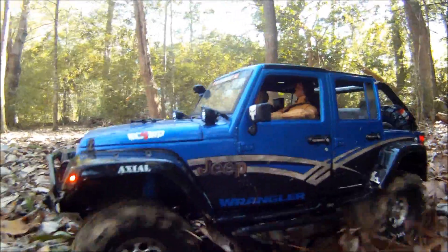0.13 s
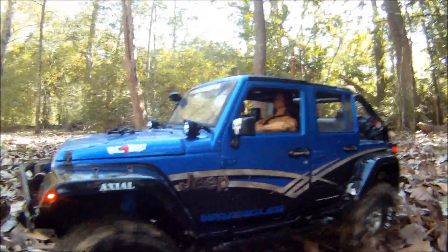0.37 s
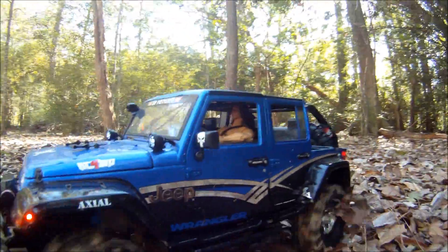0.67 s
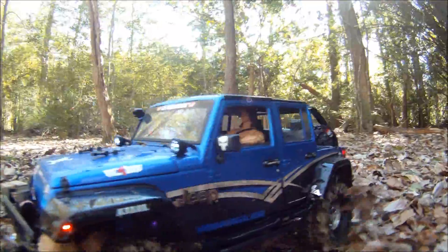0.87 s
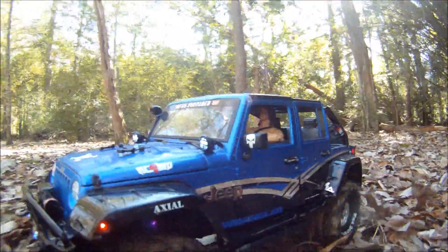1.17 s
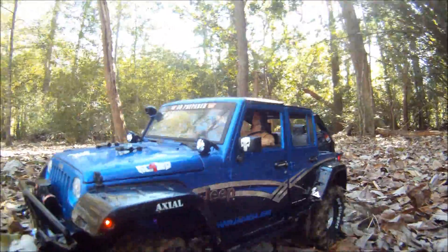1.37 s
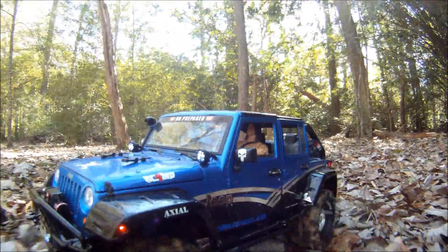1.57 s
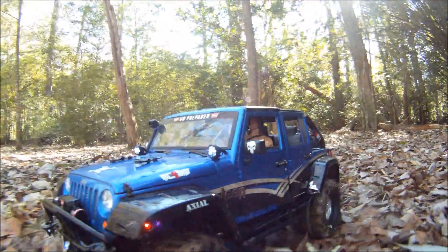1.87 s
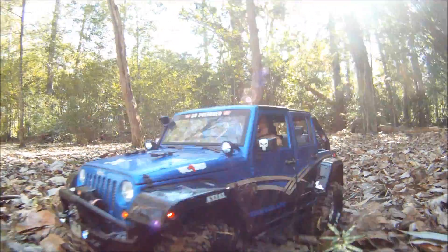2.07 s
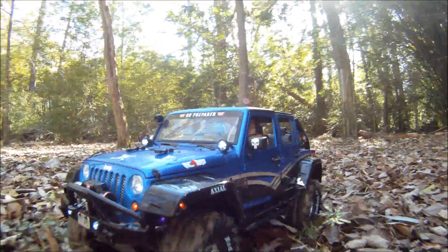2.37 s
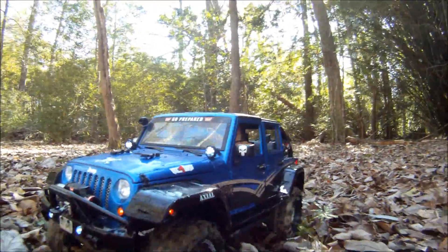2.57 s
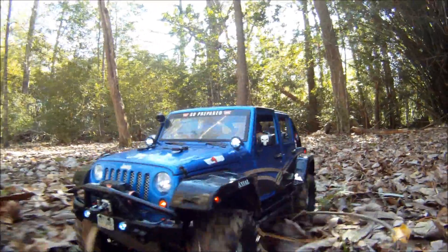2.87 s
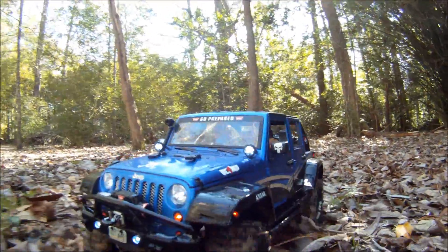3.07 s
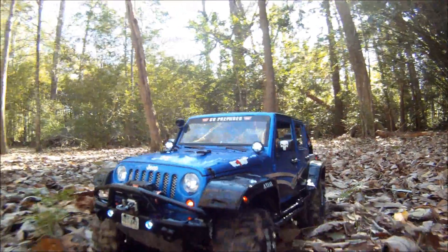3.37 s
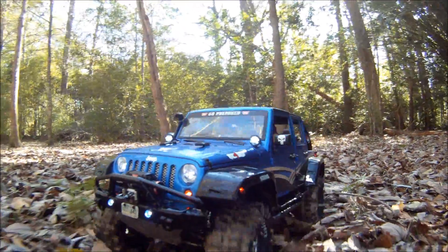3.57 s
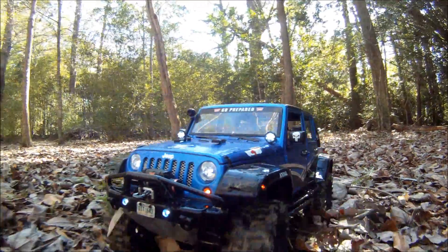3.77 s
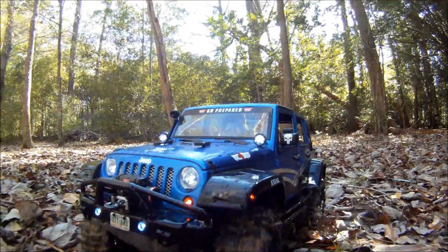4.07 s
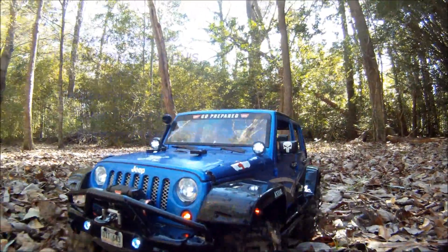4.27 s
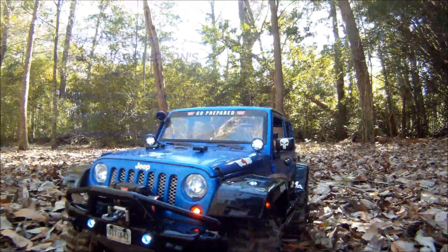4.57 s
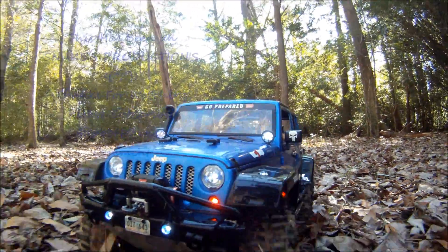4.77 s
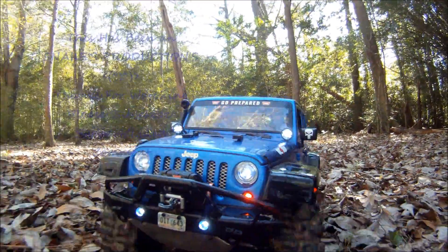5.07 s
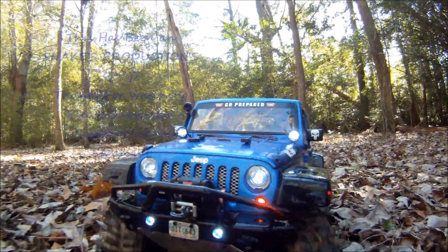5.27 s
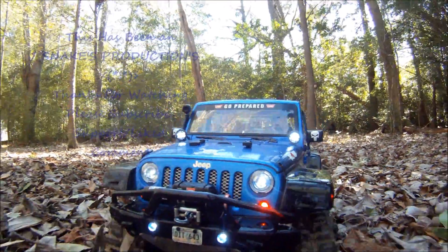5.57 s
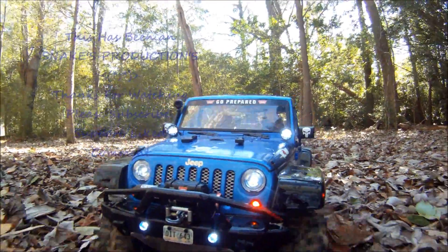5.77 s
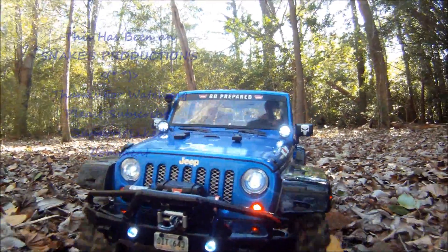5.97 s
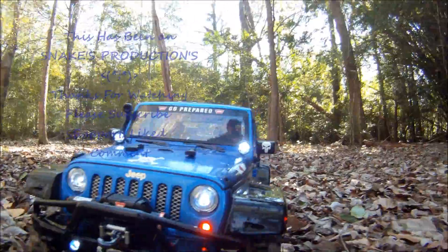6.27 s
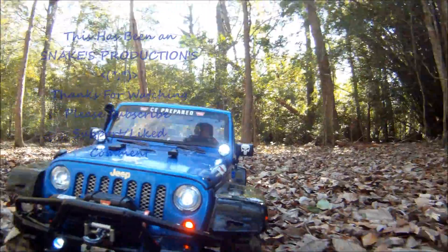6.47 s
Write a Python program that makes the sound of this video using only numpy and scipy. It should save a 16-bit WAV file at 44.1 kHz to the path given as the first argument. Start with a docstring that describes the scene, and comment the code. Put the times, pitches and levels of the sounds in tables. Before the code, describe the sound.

A small remote-control truck rolls steadily over dry leaves in a quiet wood. Leaves crunch continuously and snap in sharp, irregular ticks, while a faint gritty motor whirr throbs underneath. Low, short thuds come as wheels drop off sticks and jolt the microphone, carried on the truck itself. The treble is glassy and lo-fi, with steady hiss; snapping grows densest and loudest near the end.

```python
"""In a wood, a small electric model truck crawls over dry leaves, carrying a camera on an arm fixed to its chassis.
Leaves crunch and snap as trains of random fractures that excite the resonances of the plastic body and camera case.
The gears whirr as noise throbbing at the motor's rate; knocks from the ground ring the bending modes of the arm.
Steady noise gives the air of the wood and microphone hiss.
The camera samples slowly and holds each sample, which mirrors the crackle into a glassy treble."""
import sys
import numpy as np
from scipy import signal
from scipy.fft import rfft, irfft
from scipy.io import wavfile
from scipy.ndimage import uniform_filter1d

SR = 44100
rng = np.random.default_rng(int(sys.argv[2]) if len(sys.argv) > 2 else 0)


def store_pcm(level_fs):
    """Save levels as 16-bit WAV."""
    pcm = np.round(np.clip(level_fs, -1, 1) * 32767).astype(np.int16)
    wavfile.write(sys.argv[1], SR, np.atleast_2d(pcm).T)


N = 292824

# Levels in the tables are settings relative to one another; the functions trim them.
# resonances of the plastic body and camera case: centre_hz, width_hz, crunch_db, snap_db
CASE_MODES = [(650, 125, -18.5, -44), (960, 260, -16.5, -37), (1190, 360, -13.5, -27.5),
              (1590, 290, -7.5, -19.5), (1948, 360, 0.5, -26), (2198, 120, -2.5, -17), (2345, 167, 3, -29),
              (2528, 307, -2, -29), (2963, 450, -6.5, -29), (3360, 240, -5, -47), (3627, 300, -2.5, -2),
              (4070, 1520, -10, -30), (4780, 320, -4.5, -2.5), (4984, 350, -8, 3), (5276, 360, -5.5, -7),
              (5740, 680, -12.5, -11)]
# steady rolling of the tyres over the leaves: time_s, crunch_db, crackle_db
ROLLING_LEVELS = [(0.0, -52, -58), (0.2, -53, -61), (0.46, -60.5, -56), (0.72, -60, -75), (0.85, -59, -57),
                  (1.46, -51, -53), (1.83, -57, -57), (2.05, -57.5, -55), (2.25, -56, -59.5),
                  (2.88, -57.5, -57.5), (3.18, -56, -56.5), (3.85, -59, -60), (4.18, -59, -57.5),
                  (4.62, -53.5, -58.5), (4.83, -56.5, -57), (5.64, -51.5, -50.5), (6.05, -54.5, -51.5),
                  (6.23, -56.5, -52), (6.45, -51.5, -63), (6.64, -55.5, -43.5)]
# heaps of leaves pressed down by a tyre: peak_time_s, crunch_db, crackle_db, length_s
LEAF_HEAPS = [(0.23, -49.5, -58, 0.103), (0.364, -51, -59, 0.043), (0.717, -53, -63, 0.065),
              (0.808, -51, -54.5, 0.097), (0.916, -45.5, -56, 0.017), (1.2, -53.5, -68, 0.088),
              (1.268, -51.5, -57, 0.11), (1.659, -48, -65, 0.079), (2.072, -47.5, -70, 0.068),
              (2.163, -48.5, -72, 0.055), (2.614, -55, -56, 0.043), (2.727, -53.5, -65, 0.02),
              (3.048, -49.5, -73, 0.059), (3.566, -51.5, -56, 0.097), (4.003, -51, -75, 0.102),
              (4.105, -48.5, -62, 0.064), (4.465, -53, -58, 0.094), (4.66, -52.5, -72, 0.066),
              (5.048, -51, -54, 0.079), (5.522, -49.5, -52, 0.038), (6.062, -49, -52.5, 0.084),
              (6.139, -46, -56, 0.036), (6.56, -44.5, -53, 0.0705)]
# slow bending modes of the camera arm: centre_hz, width_hz, level_db
SWAY_MODES = [(65.58, 7.15, -0.5), (73.7, 30, -20)]
# fast bending modes of the camera arm: centre_hz, width_hz, level_db
SHUDDER_MODES = [(119, 30, -21), (135.1, 9.3, 0), (154.6, 26.5, 5.5), (217, 26, -9)]
# roughness of the ground, as steady shaking of the arm: time_s, sway_db, shudder_db
GROUND_ROUGHNESS = [(0.0, -53, -68), (0.83, -63.5, -67.5), (1.48, -54, -71), (1.9, -57.5, -72.5),
                    (2.5, -58, -66), (2.72, -53.5, -70.5), (4.18, -65, -72), (4.55, -54, -60.5),
                    (5.49, -55, -78), (5.84, -48.5, -53), (6.44, -52.5, -66), (6.64, -49.5, -60)]
# a wheel drops off a stick or a root and jolts the arm: start_s, sway_db, shudder_db
WHEEL_DROPS = [(0.13, -47.5, -72), (0.52, -49, -55.5), (0.65, -58, -57.5), (0.77, -46.5, -61),
               (0.85, -47, -57), (1.03, -52, -58), (1.207, -37.5, -55), (1.333, -40, -45.5),
               (1.45, -54, -49), (1.53, -45.5, -57), (2.09, -52, -55), (2.631, -38.5, -50),
               (2.81, -37.5, -45.5), (2.86, -43, -62), (3.04, -54, -55), (3.24, -56.5, -61),
               (3.88, -52.5, -59), (4.08, -55, -68), (4.44, -45.5, -50), (4.5, -52, -54), (4.61, -53, -58),
               (4.7, -58, -68), (4.84, -47, -67), (5.041, -47, -50), (5.13, -44.5, -61.5),
               (5.3, -45.5, -53.5), (5.38, -48.5, -48), (5.586, -38.5, -58), (5.66, -40.5, -58),
               (5.715, -35, -53), (5.87, -49, -55), (6.114, -36, -48.5), (6.2, -41, -57), (6.5, -46, -56)]
# spectrum of the slow rocking on the suspension: frequency_hz, density_db (per Hz)
ROCKING_SPECTRUM = [(8, -5.5), (17, 3), (26, -5), (48, 1), (70, -9.5), (110, -21), (250, -26), (600, -29),
                    (1200, -34), (3000, -84)]
# spectrum of the air of the wood and microphone hiss: frequency_hz, density_db (per Hz)
AIR_SPECTRUM = [(150, -4), (350, -2.5), (650, -6), (1100, 4.5), (2200, 10), (4000, 0.5), (5800, 0)]
# the loudest single leaves snapping: start_s, level_db, dull_part_db (relative to level_db)
LEAF_SNAPS = [(0.1374, -33.5, -4), (0.179, -29, -20), (0.8823, -33, -21), (0.9412, -29, -9),
              (1.4555, -38, -11), (1.5902, -31, -3), (1.7827, -34.5, -3.5), (1.8557, -32.5, -5),
              (1.906, -34.5, -20), (1.9733, -29.5, -20), (2.4422, -34.5, -6), (2.9663, -30.5, -8),
              (3.485, -33.5, -20), (4.096, -36, 4.5), (4.136, -30, -1), (4.3853, -30, -1.5),
              (4.6333, -34.5, -5), (4.8895, -27.5, -27), (4.9376, -30.5, -28), (5.0149, -31, -12),
              (5.2906, -34, -24), (5.5698, -31, -20), (5.7224, -40, -2), (5.7432, -27, -3),
              (5.8091, -32, -5), (6.1738, -32, -2.5), (6.211, -32, -5), (6.2545, -26, -10),
              (6.4574, -30, -4), (6.475, -31, 0), (6.5679, -25, -18), (6.5998, -25, -6.5),
              (6.616, -29, -13)]
# whole leaves and twigs giving way under a tyre: start_s, level_db, knock_db (change of the low resonances)
LEAF_CRUSHES = [(0.2546, -45, -4), (0.837, -41, 8), (0.935, -42, 8), (1.0345, -43, -3), (1.088, -46, -3),
                (1.1925, -40, -1), (1.4547, -36.5, 9), (1.667, -37, -7), (2.139, -44, -9),
                (2.182, -40.5, -3), (3.055, -37.5, -15), (3.784, -45, 0), (5.983, -42.5, -1.5),
                (6.576, -38, -13)]

UNEVEN_DB, UNEVEN_HZ = 1.5, 18.4   # the leaf cover varies from tread to tread
LUMPY_DB, LUMPY_HZ = 4, 17.4   # the shaking comes in lumps
JOLT_RISE_S, SWAY_DECAY_S, SHUDDER_DECAY_S = 0.01, 0.055, 0.039
SNAP_S, DULL_SNAP_S, CRUSH_S = 0.0008, 0.004, 0.0057   # decay times of the breaking force
SMALL_SNAPS_PER_S, SMALL_SNAP_DB, SMALL_SNAP_SPREAD_DB = 14, 15, 1   # level is over the rolling crackle
RING_SCATTER_DB = 2.8   # each break excites the resonances in a different mix
HOLD_HZ, CUTOFF_HZ = 12000, 15300


def from_db(db):
    """Decibel law: an amplitude gain is ten to the power of dB / 20."""
    return 10 ** (np.asarray(db) / 20)


def power_sum(a_db, b_db):
    """Incoherent addition: the powers of two unrelated sounds add."""
    return 20 * np.log10(np.hypot(from_db(a_db), from_db(b_db)))


def rms_one(x):
    """Normalisation to unit mean power."""
    return x / np.sqrt(np.mean(x ** 2) + 1e-20)


def in_time(rows):
    """Linear interpolation of each column of a curve table, sample by sample."""
    s, *columns = np.transpose(rows)
    return [np.interp(np.arange(N) / SR, s, column) for column in columns]


def drift(corner_hz):
    """Low-passed noise: two equal poles at corner_hz give a smooth random course with a spread of one."""
    step = 40   # samples between the computed points
    pole = np.exp(-2 * np.pi * corner_hz * step / SR)
    points = rng.standard_normal(N // step + 2002)
    slow = signal.lfilter([1], [1, -2 * pole, pole * pole], points)[2000:]   # drop the settling
    return np.interp(np.arange(N) / step, np.arange(len(slow)), rms_one(slow))


def evened(x, seconds):
    """Envelope levelling: power over stretches of this length is held near one; finer grain stays."""
    size = max(int(seconds * SR), 2)
    power = uniform_filter1d(uniform_filter1d(x ** 2, size), size)
    return x / np.sqrt(np.abs(power) + 1e-12)


def noise(spectrum):
    """Spectral shaping: white noise weighted by a spectrum, then brought to unit power."""
    hz, db = np.transpose(spectrum)
    log_bins = np.log(np.arange(N // 2 + 1) * SR / N + 1e-3)
    gain = from_db(np.interp(log_bins, np.log(hz), db))
    return rms_one(irfft(rfft(rng.standard_normal(N)) * gain, N))


def resonate(x, hz, width):
    """Damped resonance: two equal resonators in cascade give steep sides and a gain of about one at the top."""
    r = np.exp(-np.pi * width / SR)
    gain = (1 - r * r) / 2
    section = [gain, 0, -gain, 1, -2 * r * np.cos(2 * np.pi * hz / SR), r * r]
    return signal.sosfilt([section] * 2, x + 1e-18)


def add(out, s, sound):
    """Superposition: mix a sound in at a given time."""
    start = max(round(s * SR), 0)
    out[start:start + len(sound)] += sound[:max(N - start, 0)]


def case_modes(brittle):
    """Modal excitation: each resonance has one level for dull crunches and another for brittle breaks."""
    return [(hz, width, snap_db if brittle else crunch_db) for hz, width, crunch_db, snap_db in CASE_MODES]


def fractures(per_s, spread_db, seconds, colour_db, wander_db, brittle):
    """Random fracture: breaks of very unequal size start at once, decay exponentially and differ in colour."""
    at = np.flatnonzero(rng.random(N) < per_s / SR)
    sizes_db = spread_db * np.minimum(rng.exponential(1, len(at)), 4)
    out = np.zeros(N)
    for hz, width, db in case_modes(brittle):
        colours_db = colour_db * np.clip(rng.standard_normal(len(at)), -2, 2)
        power = np.zeros(N)
        power[at] = from_db(sizes_db + colours_db) ** 2
        force = np.sqrt(signal.lfilter([1], [1, -np.exp(-2 / (seconds * SR))], power + 1e-12))
        # the mix of resonances shifts as the tread moves from leaf to leaf
        gain = from_db(db + wander_db * drift(13.6))
        out += gain * resonate(force * rng.standard_normal(N), hz, width)
    return out


def heaps(column):
    """Compression of a heap: the power of its crunch or crackle follows a bell curve; the result is in dB."""
    t = np.arange(N) / SR
    power = np.zeros(N)
    for s, *levels_db, seconds in LEAF_HEAPS:
        bell = np.exp(-np.minimum((2 * (t - s) / seconds) ** 2, 50))
        power += from_db(levels_db[column]) ** 2 * bell
    return 10 * np.log10(power)


def leaf_bed(crunch_db, crackle_db):
    """Granular crushing: dense dull breaks under the treads and sparser bright ticks from dry leaf edges."""
    crunch = fractures(per_s=480, spread_db=2.5, seconds=0.0031, colour_db=3.0, wander_db=4.0, brittle=False)
    crackle = fractures(per_s=360, spread_db=1.0, seconds=SNAP_S, colour_db=1.5, wander_db=3.0, brittle=True)
    return from_db(crunch_db) * evened(crunch, 0.11) + from_db(crackle_db) * evened(crackle, 0.035)


def drivetrain(crunch_db):
    """Modulated friction: gear teeth rasp into the body, throbbing once per motor turn; more crunch, more whirr."""
    effort_db = crunch_db - np.mean(crunch_db)
    turns_per_s = 110 * from_db(0.321 * effort_db + 0.377 * drift(5.04))
    mesh = from_db(2.2 * np.cos(2 * np.pi * np.cumsum(turns_per_s) / SR))
    rasp = sum(from_db(db) * resonate(mesh * rng.standard_normal(N), hz, width)
               for hz, width, db in case_modes(brittle=False))
    return from_db(-56.5 + 0.74 * effort_db) * rms_one(rasp)


def jolts(column, decay_s):
    """Transient response: each jolt of one set of modes rises quickly and decays exponentially; result in dB."""
    t = np.arange(SR) / SR
    shape = np.minimum(t / JOLT_RISE_S, 1) * np.exp(-np.maximum(t - JOLT_RISE_S, 0) / decay_s)
    power = np.zeros(N)
    for s, *levels_db in WHEEL_DROPS:
        add(power, s, (from_db(levels_db[column]) * shape) ** 2)
    return 10 * np.log10(power + 1e-14)


def camera_arm():
    """Forced vibration: knocks softened by the tyres ring the arm's bending modes while the truck rocks."""
    out = from_db(-54.5) * noise(ROCKING_SPECTRUM)
    soft_tyres = signal.butter(6, 225, fs=SR, output="sos")
    ground_db = in_time(GROUND_ROUGHNESS)
    mode_sets = [(SWAY_MODES, SWAY_DECAY_S), (SHUDDER_MODES, SHUDDER_DECAY_S)]
    for column, (modes, decay_s) in enumerate(mode_sets):
        shaking_db = ground_db[column] - 0.8 + LUMPY_DB * drift(LUMPY_HZ)
        level_db = power_sum(shaking_db, jolts(column, decay_s))
        # about 120 knocks a second, with one second ahead for the modes to settle
        impulses = (rng.random(N + SR) < 120 / SR) * rng.standard_normal(N + SR)
        knocks = signal.sosfilt(soft_tyres, impulses + 1e-18)
        ringing = sum(from_db(db) * resonate(knocks, hz, width) for hz, width, db in modes)[SR:]
        out += from_db(level_db + 0.27) * evened(rms_one(ringing), 0.035)
    return out


def still_air():
    """Stationary noise: the air of the wood and microphone hiss keep one level and colour."""
    return from_db(-59.5) * noise(AIR_SPECTRUM)


def tear(seconds, brittle, knock_db=0):
    """Stuttering fracture: a sudden force fades in uneven steps; knock_db alters the lowest resonances."""
    t = np.arange(SR // 20) / SR
    stutter = from_db(3.0 * rng.standard_normal(len(t) // 20 + 1)).repeat(20)[:len(t)]
    force = np.exp(-(t / seconds) ** 1.3) * stutter
    burst = np.zeros(len(t))
    for hz, width, db in case_modes(brittle):
        db = db + knock_db * (hz < 1750) + RING_SCATTER_DB * rng.standard_normal()
        ringing = resonate(force * rng.standard_normal(len(t)), hz, 1.07 * width)
        burst += from_db(db) * np.sqrt(width) * rms_one(ringing)
    # the loudest 64 samples get a mean power of one half, as in a sine of amplitude one
    return burst / np.sqrt(2 * uniform_filter1d(burst ** 2, size=64).max())


def breaking_leaves(crackle_db):
    """Brittle failure: sharp snaps and longer crushes stand out of the bed; lesser leaves snap at random."""
    out = np.zeros(N)
    for s, level_db, dull_db in LEAF_SNAPS:
        add(out, s, from_db(level_db - 7.0) * tear(SNAP_S, brittle=True))
        add(out, s, from_db(level_db + dull_db - 7.5) * tear(DULL_SNAP_S, brittle=False))
    for s, level_db, knock_db in LEAF_CRUSHES:
        add(out, s, from_db(level_db + 1.6) * tear(CRUSH_S, brittle=False, knock_db=knock_db))
    for at in np.flatnonzero(rng.random(N) < SMALL_SNAPS_PER_S / SR):
        level_db = crackle_db[at] + SMALL_SNAP_DB + SMALL_SNAP_SPREAD_DB * rng.standard_normal()
        add(out, at / SR, from_db(level_db - 5.5) * tear(SNAP_S, brittle=True))
    return out


def scene():
    """Superposition of leaves, gears and shaking over the still air."""
    rolling_db, brittle_db = in_time(ROLLING_LEVELS)
    uneven_db = UNEVEN_DB * drift(UNEVEN_HZ)
    crunch_db = power_sum(rolling_db - 1.0 + uneven_db, heaps(0) - 0.7)
    crackle_db = power_sum(brittle_db - 3.0 + uneven_db, heaps(1))
    truck = leaf_bed(crunch_db, crackle_db) + drivetrain(crunch_db) + camera_arm()
    return (truck + still_air() + breaking_leaves(brittle_db))[None]


def record(dry):
    """Zero-order hold: each slow sample is held four times, mirroring the sound about half the slow rate."""
    slow = signal.resample_poly(dry, HOLD_HZ, SR, axis=1)
    steps = np.repeat(slow, 4, axis=1)
    held = signal.resample_poly(steps, SR, 4 * HOLD_HZ, axis=1)[:, :N]
    low_pass = signal.ellip(12, .1, 80, CUTOFF_HZ, fs=SR, output="sos")
    return signal.sosfilt(low_pass, held)


dry = scene()
out = record(dry)
store_pcm(out)
```